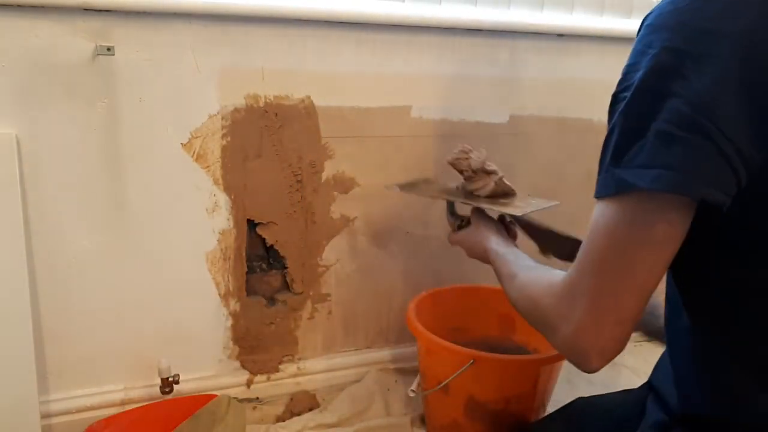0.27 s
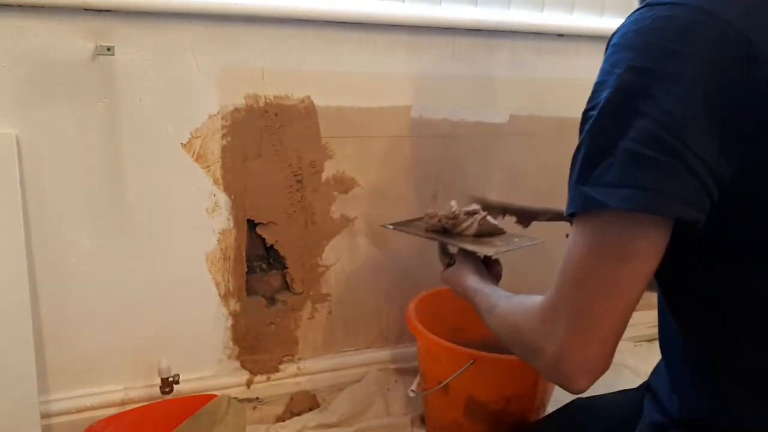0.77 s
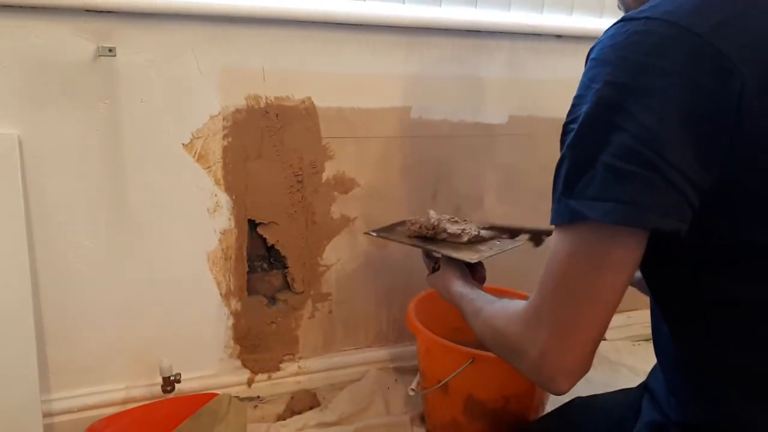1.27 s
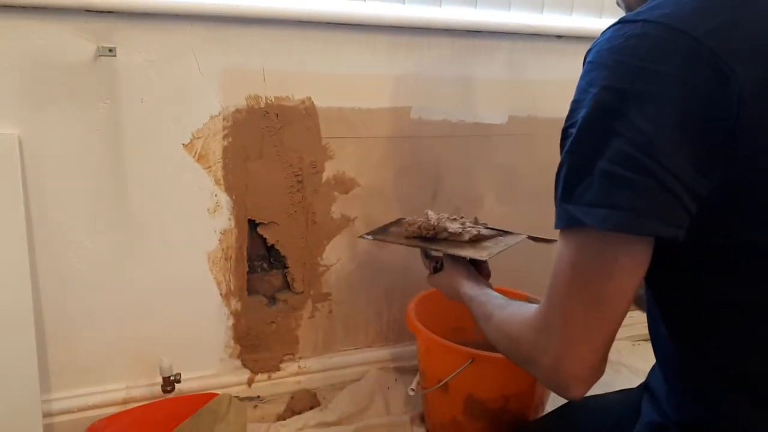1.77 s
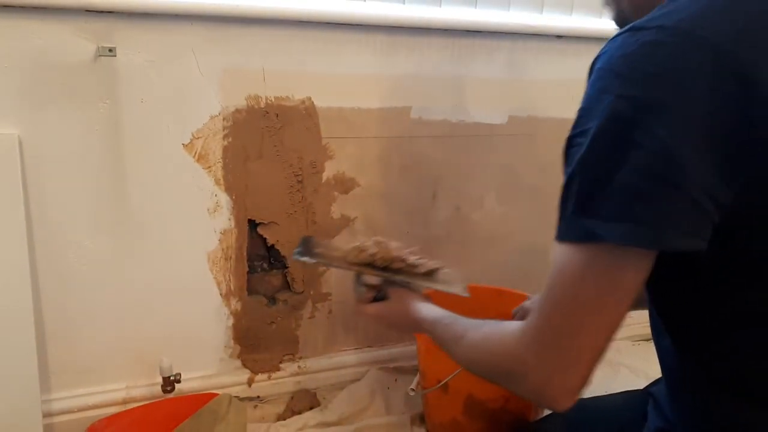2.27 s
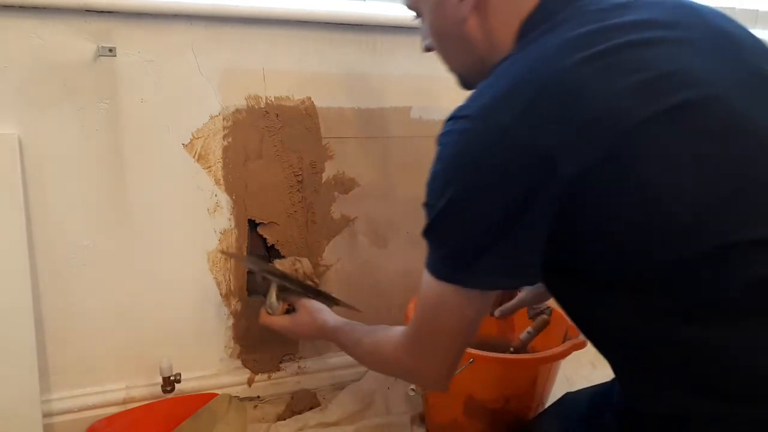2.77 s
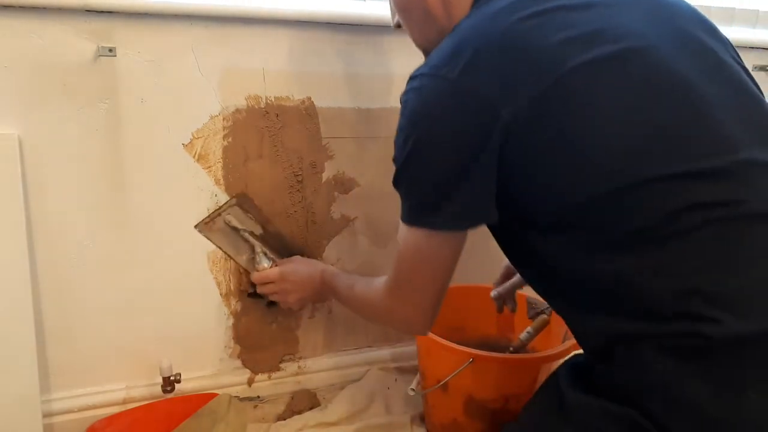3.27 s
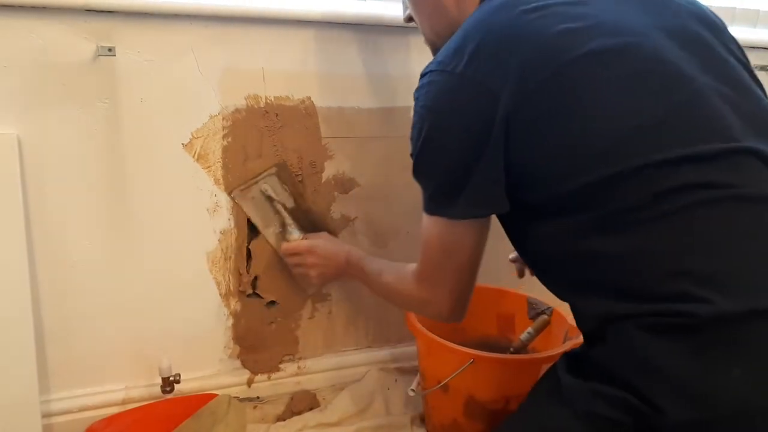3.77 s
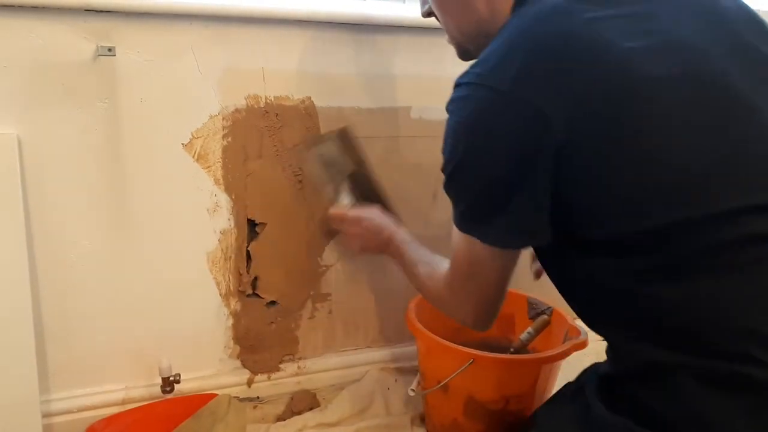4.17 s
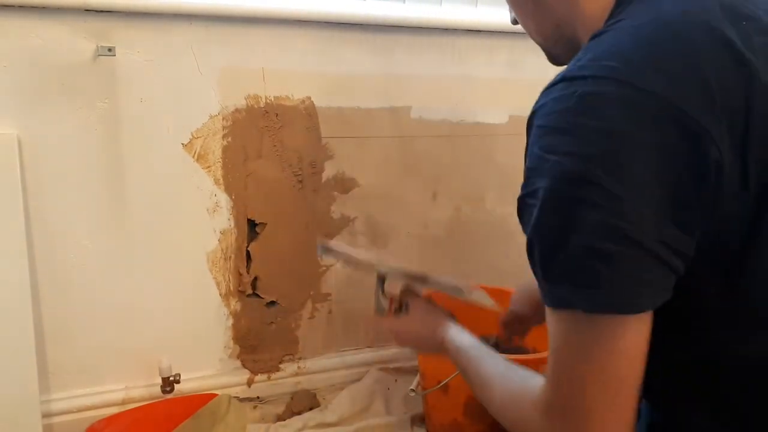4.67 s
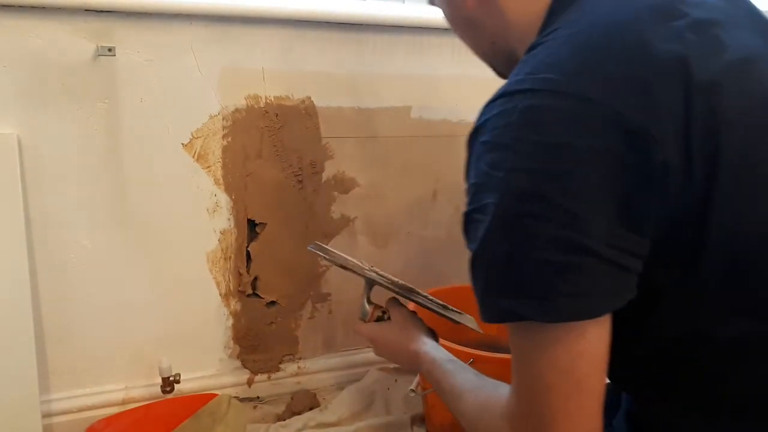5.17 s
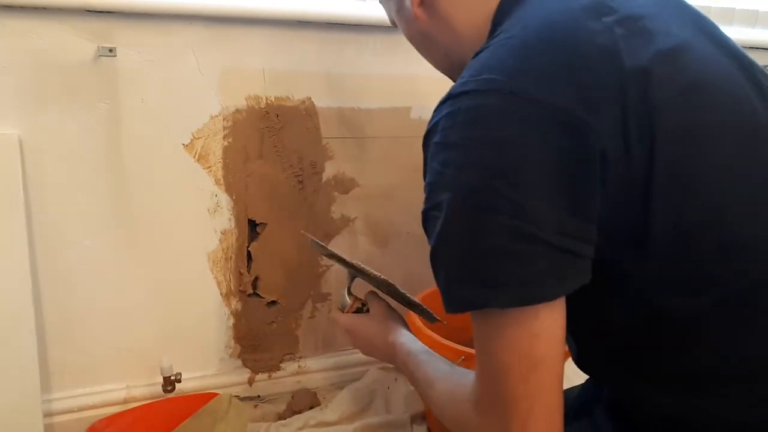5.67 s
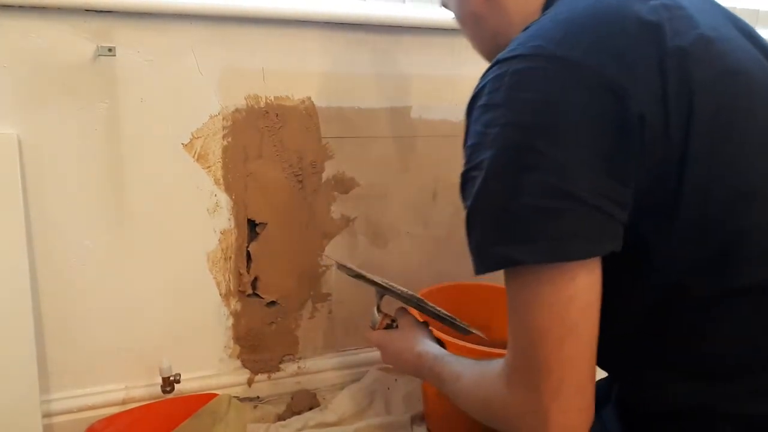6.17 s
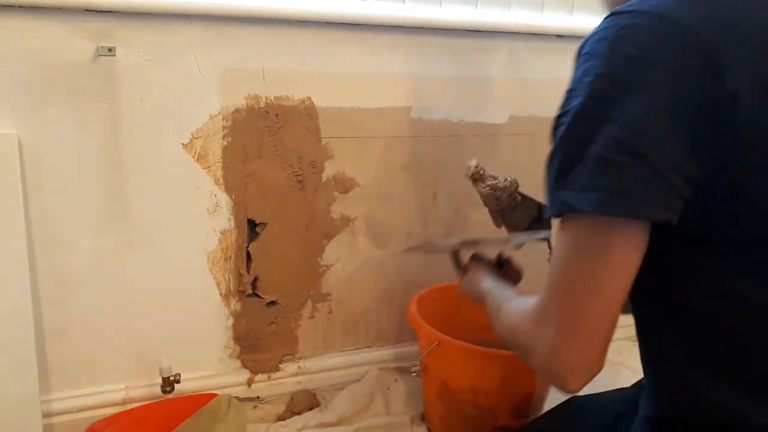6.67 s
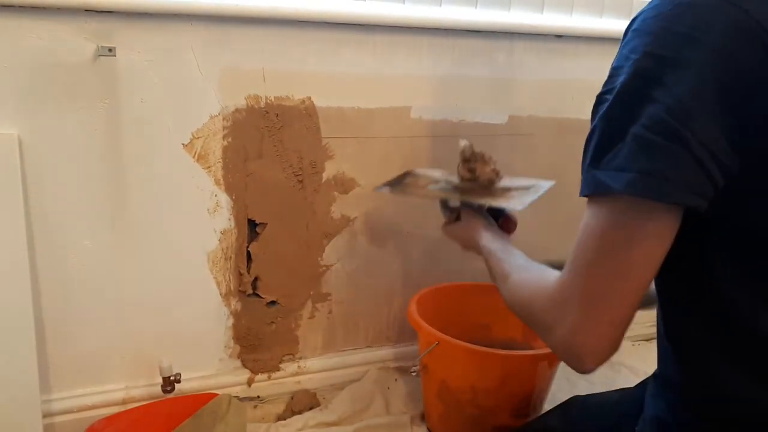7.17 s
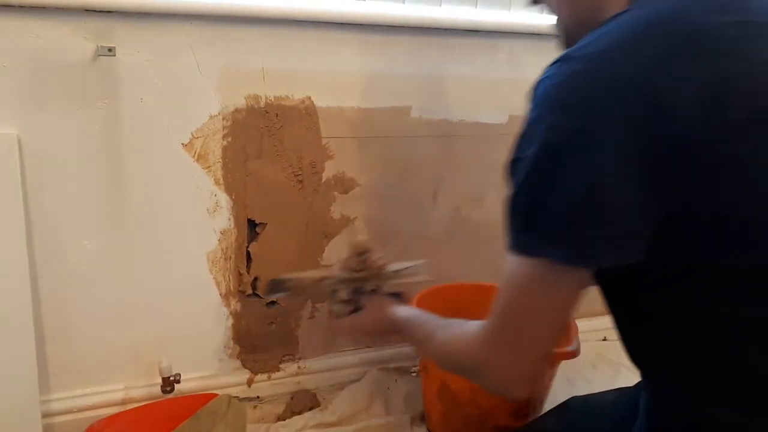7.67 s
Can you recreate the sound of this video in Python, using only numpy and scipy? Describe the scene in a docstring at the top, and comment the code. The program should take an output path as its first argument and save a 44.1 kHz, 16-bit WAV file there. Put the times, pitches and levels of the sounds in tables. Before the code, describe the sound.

A close stereo pickup in a bare room with a short echo, the right side muffled, over faint steady rumble, hum and hiss. At 0-0.3 s a trowel makes three quick gritty scrapes on a steel float, with thin metallic taps; slight rustles follow around 0.6 s. Near-quiet until a faint tick at 1.4 s and two short sandy scrapes at 1.6-1.8 s. At 2.5 s a brief rough plastic bucket scrape and knock. Light steel taps at 2.9-3.2 s, then soft wall strokes from 3.4 s, a firmer drag with clinks at 3.8 s, and a bright ringing double clank at 4.1 s. Hollow bucket knocks at 5.0-5.4 s lead to a coarse dig and floor thump at 5.5 s, then weaker bumps until 6.2 s. At 6.75-7.0 s two steel scrapes, the second loud and sharp. Bucket scuffing and a knock with a soft thump end it at 7.3-7.6 s.

```python
"""A plasterer's steel float is scraped with a small trowel and dragged over the wall, in a bare room; between
times the plasterer digs in a plastic bucket. Sand grains slip under the steel: random clicks, shaped by each push
of the hand, ring the modes of the blade or bucket. Taps and knocks ring them too and crush grit into short hisses.
Floor thumps and soft treble rustles join in; all these echo in the room, over a steady bed of rumble, hum and hiss.
Two microphone ports pick it up, one of them half covered, and a gain control turns loud moments down."""
import sys
import numpy as np
from scipy import signal
from scipy.fft import rfft, irfft, next_fast_len
from scipy.io import wavfile
from scipy.ndimage import uniform_filter1d

SR = 44100
rng = np.random.default_rng(int(sys.argv[2]) if len(sys.argv) > 2 else 0)


def wav_record(signal):
    """Record a signal, one row per channel, as 16-bit PCM in the file named by sys.argv[1]."""
    frames = np.transpose(np.atleast_2d(signal))
    bounded = np.clip(frames, -1, 1)
    # unit amplitude maps onto the largest positive 16-bit level
    quanta = np.round(bounded * 32767).astype(np.int16)
    wavfile.write(sys.argv[1], SR, quanta)


N = 348831   # length in samples

# Background air noise. Each row: frequency in Hz, relative strength in dB per Hz.
AIR_SPECTRUM = [(15, -53), (25, -26), (43, -31.5), (96, -1.5), (156, -19), (173, -14), (246, -6.5),
                (281, -15), (399, -23.5), (433, -10), (523, -26), (666, -23.5), (1570, -31), (15500, -42)]
AIR_DB = -62   # overall level
# How alike left and right are. Each row: frequency in Hz, likeness from -1 to 1.
LEFT_RIGHT_LIKENESS = [(60, 0.55), (240, 0.85), (950, -0.092), (3770, -0.84), (15000, 0.15)]
# How long the room rings. Each row: frequency in Hz, seconds to die away by 60 dB.
ROOM_DECAY = [(80, 1), (300, 0.4), (1000, 0.43), (3000, 0.42), (7000, 0.39), (12000, 0.17), (16000, 0.52)]
# Tone of the open left port. Each row: frequency in Hz, gain in dB.
OPEN_PORT_TONE = [(5500, -0.72), (6800, 1), (7600, 5), (8300, -1.5), (9000, -5), (11000, 0.5)]
# Tone of the half-covered right port. Each row: frequency in Hz, gain in dB.
COVERED_PORT_TONE = [(60, -1.5), (200, 0), (700, -4.5), (2400, -9), (4400, -15), (8000, -42.5),
                     (12000, -15), (16000, -25.5)]
# Weight on the floorboards. Each row: start in seconds, strength of the push in dB.
FLOOR_PUSHES = [(2.466, -61.5), (5.48, -52), (7.358, -73), (7.501, -59)]
# Resonances of the floor. Each row: frequency in Hz, width in Hz, strength in dB.
FLOOR_RESONANCES = [(80.4, 65, -19), (99.8, 29, 18), (149, 52, 25.5)]
# Faint treble rustles. Each row: start in seconds, strength in dB, length in seconds.
RUSTLE_PUFFS = [(0.577, -61, 0.085), (0.702, -61.5, 0.077), (4.659, -67.5, 0.11), (4.907, -53.5, 0.094),
                (5.424, -53.5, 0.087), (7.58, -65, 0.16)]
# Hiss of fine grit. Each row: frequency in Hz, relative strength in dB per Hz.
GRIT_SPECTRUM = [(290, -35), (500, -12.5), (1090, -16), (1250, -12), (1470, -5.5), (2260, -9), (2610, -14),
                 (3240, -11.5), (7560, -15.5), (9110, -16), (15500, -20.5)]
# Pushes in the bucket. Each row: start in seconds, rise in seconds, fall in seconds, grinding at the start in dB,
# grinding at the top in dB, low modes in dB above the grinding, fine grit in dB above the grinding.
BUCKET_PUSHES = [(2.462, 0.0058, 0.042, -24, -38.5, -2, -29), (2.51, 0.072, 0.032, -42, -34, -4.5, -20.5),
                 (4.955, 0.092, 0.22, -50, -48, 2.5, -6.5), (5.137, 0.014, 0.16, -55, -53.5, 8, -3.5),
                 (5.37, 0.041, .07, -63, -66, 30, -5.5), (5.474, 0.0097, 0.27, -36, -23, -1.5, -17.5),
                 (5.67, 0.074, .14, -61, -45.5, 9, -10.5), (5.95, 0.11, 0.062, -61.5, -57, 3.5, -3.5),
                 (6.09, 0.039, 0.14, -64, -50.5, 0.5, -2.5), (7.3, 0.092, 0.056, -50, -53, -11, -21),
                 (7.5, 0.038, 0.13, -32.5, -51.5, -4.5, -35)]
# Knocks on the bucket. Each row: time in seconds, strength in dB, crack in dB above it, hardness in dB per octave,
# frequency in Hz favoured by grip and flex from then on, upper frequency in Hz favoured by the struck spot.
BUCKET_HITS = [(2.465, -21, -31, 3, 314, 1564), (4.957, -17.5, -22.5, -9, 330, 444),
               (5.136, -11, -36, -4, 385, 820), (5.169, -24.5, -12.5, 2, 366, 830),
               (5.37, -12, -43, -12, 369, 444), (5.475, -19.5, -3, 4, 244, 1750),
               (5.728, -25.5, -16, 4, 284, 810), (6.107, -27, -20.5, -5, 422, 820),
               (7.346, -33, -26, 6, 411, 820), (7.501, -21, -30, 1.5, 319, 2700)]
# Resonances of the bucket. Each row: frequency in Hz, width in Hz before hand damping, strength in dB.
BUCKET_MODES = [(192, 87, -4), (270.7, 29, -1.5), (317.2, 12.3, -1.5), (349.7, 14.4, 1), (444, 40, 4),
                (614, 66, -3), (820, 72, 1), (1010, 270, -2), (1212, 140, -1), (1564, 400, 0),
                (1750, 430, -2.5), (2000, 72, -7.5), (2700, 660, -9.5), (3240, 720, -4.5),
                (4060, 690, -20.5)]
# Pushes of steel on steel or wall. Same columns as the bucket pushes.
STEEL_PUSHES = [(0.0, 0.0076, 0.077, -46.5, -43, -6.5, -3.5), (0.07, 0.037, .055, -44, -34.5, -10.5, -4),
                (0.165, 0.049, 0.049, -42.5, -34.5, -5.5, 6), (1.578, .085, .03, -66.5, -44.5, -7, 4.5),
                (1.685, 0.09, 0.046, -38.5, -31.5, -6, 3.5), (3.43, 0.087, 0.17, -68.5, -42.5, -13, -12),
                (3.64, 0.07, 0.075, -51, -45, -20, -7), (3.80, 0.057, 0.46, -47.5, -34.5, -13.5, -4.5),
                (4.052, 0.052, 0.054, -33, -34, -12.5, -16.5),
                (6.742, 0.095, 0.065, -43, -33.5, -5.5, -5.5), (6.89, 0.061, .07, -39, -18.5, -11.5, -7)]
# Touches of the steel. Same columns as the bucket knocks.
STEEL_HITS = [(0.004, -37.5, -2, 5, 1350, 610), (0.076, -27, -12.5, 3, 1380, 632),
              (0.203, -29, -6.5, -3, 1480, 1680), (1.357, -50, -3, -2.5, 1183, 3850),
              (1.581, -50.5, 5.5, -5.5, 1290, 438), (2.925, -43.5, -12, 7, 2550, 5000),
              (3.151, -35.5, -24.5, -8, 1400, 880), (3.178, -43, -25, -12, 1420, 610),
              (3.432, -46, -18.5, 0, 1440, 1680), (3.47, -48.5, 1, -1.5, 1390, 875),
              (3.699, -28.5, -27.5, -2, 1400, 875), (3.715, -34, 0.5, 12, 1360, 875),
              (3.826, -21.5, -14.5, 3, 1440, 1680), (3.86, -16, -17, 3.5, 1420, 1680),
              (4.059, -11, -23, 1.5, 1175, 642), (4.124, -17.5, -20, -3.5, 1185, 626),
              (6.745, -35, -11, 4.5, 1216, 1680), (6.935, -18.5, -6.5, 8.5, 1211, 2300)]
# Resonances of the blade. Same columns as the bucket resonances.
BLADE_MODES = [(460, 79, -8.5), (617, 160, -14.5), (830, 55, -15), (878, 19, -4), (1165, 31, 4.5),
               (1247, 10, 8.5), (1331, 57, 14), (1320, 11, -7.5), (1394, 15, 0), (1680, 26, 1),
               (1960, 180, -11), (2150, 75, -20), (2550, 51, -1.5), (2750, 54, -22), (3200, 63, -17.5),
               (3850, 180, -20.5), (5000, 77, -18)]
# Easing off past the top of a push, in dB per second: grinding, low modes, fine grit.
EASE_RATES = (125.5, 111, 89)
# Band of the coarse grains: lower edge in Hz, upper edge in Hz.
COARSE_BAND = (1860, 4300)

LOW_MODES_HZ = 700   # modes below this count as low
LAND_S, LIFT_S = 0.00065, 0.02   # seconds for a push to land and to lift away
SPOT_OCTAVES = 0.07   # reach of a struck spot
CUTOFF_HZ = 15800   # the top is cut above this


def amp(db):
    """Turn a level in dB into a gain."""
    return 10 ** (np.asarray(db) / 20)


def rms_one(x):
    """Scale a signal to an rms of 1."""
    return x / np.sqrt(np.mean(x ** 2) + 1e-20)


def at_hz(points, hz):
    """Read a table between its rows, on a log-frequency axis."""
    table_hz, values = np.array(points)[:, 0], np.array(points)[:, 1]
    return np.interp(np.log(hz + 1), np.log(table_hz), values)


def band_pass(x, edges):
    """Keep what lies between two frequencies in Hz."""
    return signal.sosfilt(signal.butter(2, edges, "band", fs=SR, output="sos"), x)


def colour(x, spectrum):
    """Give a sound the dB response of a table, with no sound ahead of its cause (minimum phase)."""
    cepstrum = irfft(np.log(amp(at_hz(spectrum, np.arange(2049) * SR / 4096))))
    # folding the second half onto the first makes the filter minimum-phase
    cepstrum[1:2048] *= 2
    cepstrum[2049:] = 0
    response = irfft(np.exp(rfft(cepstrum)))
    response = response.reshape((1,) * (x.ndim - 1) + (-1,))
    return signal.oaconvolve(x, response, axes=-1)[..., :N]


def drift(rate_hz):
    """Slow random wander with a spread of 1: smoothed noise, drawn at every 40th sample."""
    r = np.exp(-2 * np.pi * rate_hz * 40 / SR)
    noise = rng.standard_normal(N // 40 + 2002)
    slow = signal.lfilter([1], [1, -2 * r, r * r], noise)[2000:]   # skip the settling
    return np.interp(np.arange(N) / 40, np.arange(len(slow)), rms_one(slow))


def ring(x, hz, width):
    """One resonance: a click rings and dies; soft contact dulls what lies far above its pitch."""
    r, w = np.exp(-np.pi * width / SR), 2 * np.pi * hz / SR
    soft = signal.lfilter(*signal.butter(2, 2 * hz, fs=SR), x + 1e-18)
    return signal.lfilter([0.5, 0, -0.5], [1, -2 * r * np.cos(w), r * r], soft)


def bands(shape):
    """Half-octave bands of white noise, each with its centre in Hz."""
    edges = 22 * 2 ** np.arange(0, 9.8, 0.5)
    white = rng.standard_normal((2,) + shape)   # neighbouring bands use different noise
    for k, (low, high) in enumerate(zip(edges, edges[1:])):
        yield np.sqrt(low * high), band_pass(white[k % 2], [low, high])


def stereo(pair, alike):
    """Mix two unrelated signals into two channels of a given likeness."""
    alike = np.clip(alike, -1, 1)
    shared, opposed = np.sqrt(1 + alike) * pair[0], np.sqrt(1 - alike) * pair[1]
    return np.array([shared + opposed, shared - opposed])


def air():
    """Distant rumble and hum of the house, passing into port hiss: noise bands whose levels wander."""
    together_db = drift(2)   # all bands swell as one
    noise = 0
    for hz, pair in bands((2, N)):
        level_db = at_hz(AIR_SPECTRUM, hz) + together_db + 0.95 * drift(6)
        noise = noise + amp(level_db) * stereo(pair, at_hz(LEFT_RIGHT_LIKENESS, hz))
    return amp(AIR_DB) * rms_one(noise) * amp([[1.2], [-1.2]])   # left a little louder


def room(x, direct_db, wet_db, tail_rise_s, move_s, count):
    """Direct sound and a dense tail dying band by band; the tools move, so the echoes keep changing."""
    t = np.arange(SR // 2 + SR // 8) / SR
    tail = 0
    for hz, pair in bands((2, count, len(t))):
        decay = amp(-60 * t / at_hz(ROOM_DECAY, hz))
        tail = tail + stereo(pair, at_hz(LEFT_RIGHT_LIKENESS, hz)) * decay
    tail *= np.clip(t / tail_rise_s, 0, 1)
    response = amp(wet_db) * tail / np.sqrt(np.mean(np.sum(tail ** 2, axis=-1)))
    places = np.arange(count)
    # the right port hears first, by a lag that depends on the place
    response[0, places, 2 + 2 * places] += amp(direct_db)
    response[1, :, 0] += amp(direct_db)
    turn = (np.arange(N) / SR / move_s - places[:, None]) % count
    share = np.sin(np.pi / 2 * np.minimum(turn, 2))   # equal-power fades from place to place
    size = next_fast_len(N + len(t))
    echoes = rfft(x * share, size) * rfft(response, size)
    return irfft(np.sum(echoes, axis=1), size)[:, :N]


def thumps():
    """Weight on the floorboards: each soft push rings the floor's resonances."""
    push = np.zeros(N)
    for start, db in FLOOR_PUSHES:
        push[int(start * SR)] = amp(db)
    return sum(amp(db) * ring(push, hz, width) for hz, width, db in FLOOR_RESONANCES)


def rustles():
    """Short soft puffs of treble noise: each rises quickly and fades in a straight line."""
    t = np.arange(N) / SR
    shape = np.zeros(N)
    for start, db, length in RUSTLE_PUFFS:
        rise = np.clip((t - start) / 0.012, 0, 1)
        fade = np.clip(1 - (t - start) / length, 0, 1)
        shape += amp(db) * rise * fade
    return shape * band_pass(rng.standard_normal(N), [4500, 9000])


def pressure(pushes):
    """Gains of grinding, low modes and fine grit: each push climbs to its top, eases off and lifts away."""
    gains = np.zeros((3, N))
    for start, rise, fall, start_db, top_db, low_db, grit_db in pushes:
        first = int(start * SR)
        t = np.arange(int((rise + fall) * SR)) / SR
        touch = np.clip(np.minimum(t / LAND_S, (rise + fall - t) / LIFT_S), 0, 1)
        climb_db = np.interp(t, [0, rise], [start_db, top_db])
        ease_db = np.outer(EASE_RATES, np.maximum(t - rise, 0))
        level_db = climb_db - ease_db + [[0], [low_db], [grit_db]]
        gains[:, first:first + len(t)] += touch * amp(level_db)
    return gains


def grains(per_s, spread_db, clump_db):
    """Slips of single sand grains: random clicks of uneven size that come in clumps."""
    sizes = amp(spread_db * np.minimum(rng.exponential(1, N), 5)) * rng.choice([-1, 1], N)
    slips = rng.random(N) < per_s / SR
    return rms_one(sizes * slips * amp(clump_db * drift(31)))


def noise_burst(clicks, decay_s):
    """Each click becomes a burst of noise that dies away exponentially."""
    return signal.lfilter([1], [1, -np.exp(-1 / (decay_s * SR))], clicks) * rng.standard_normal(N)


def landing(at, jolt_s):
    """An edge lands with one firm first touch and a short rattle."""
    contact = np.zeros(N)
    contact[at] = np.sqrt(2 / (jolt_s * SR))
    return 0.6 * noise_burst(contact, jolt_s) + 0.54 * (contact > 0)


def scraped(pushes, hits, modes, per_s, spread_db, clump_db, ring_db, low_db, grit_db, coarse_db,
            hit_db, tick_db, pivot_hz, favour_db, octaves, jolt_s):
    """Grains and blows excite one body's modes; both also crack directly into the air."""
    grind, low, fine = pressure(pushes)
    sand = grains(per_s, spread_db, clump_db)
    hit_s, strength_db, crack_db, hardness, favoured_hz, upper_hz = np.transpose(hits)
    at = (hit_s * SR).astype(int)
    # the latest hit at each moment; the first one also serves before it
    last_hit = np.maximum(np.searchsorted(at, np.arange(N), side="right") - 1, 0)
    mode_hz, _, mode_db = np.transpose(modes)
    is_low = mode_hz < LOW_MODES_HZ
    group_power = [np.sum(amp(mode_db[is_low == group]) ** 2) for group in (False, True)]
    rubbing = [amp(ring_db) * grind * sand, amp(low_db) * low * sand]
    jolt = landing(at, jolt_s)
    body = np.zeros(N)
    for k, (hz, width, db) in enumerate(modes):
        width = max(width, hz / 35)   # hand and wet plaster damp every mode
        group = int(is_low[k])
        spot_db = 6.9 * np.exp(-(np.log2(hz / upper_hz) / SPOT_OCTAVES) ** 2)
        tilt_db = hardness * np.log2(hz / pivot_hz)   # hard blows favour high modes
        mode_share = amp(db) * np.sqrt(4 * np.pi * width / SR / group_power[group])
        # rubbing goes on near the struck spot and keeps part of its hardness
        rub_gain = amp(0.53 * spot_db + 0.21 * tilt_db)[last_hit]
        hit_gain = amp(strength_db + hit_db + db + spot_db + tilt_db)[last_hit]
        force = rubbing[group] * mode_share * rub_gain + jolt * hit_gain
        grip = amp(favour_db * np.exp(-(np.log2(hz / favoured_hz) / octaves) ** 2))
        body += (-1) ** k * ring(force * grip[last_hit], hz, width)
    ticks = np.zeros(N)
    ticks[at] = amp(strength_db + crack_db + tick_db)
    crumbs = noise_burst(ticks, 0.0037)   # a blow crushes grit for a few ms
    coarse = band_pass(amp(coarse_db) * grind * sand, COARSE_BAND)   # big grains follow the grinding
    treble_gain = amp(at_hz(GRIT_SPECTRUM, np.linspace(3500, SR / 2, 500)))
    grit = colour(amp(grit_db) * fine * sand + crumbs, GRIT_SPECTRUM) / np.sqrt(np.mean(treble_gain ** 2))
    return body + coarse + grit


def plastic_bucket():
    """Digging in the bucket: grains and knocks ring its broad plastic modes."""
    return scraped(BUCKET_PUSHES, BUCKET_HITS, BUCKET_MODES, per_s=5800, spread_db=4, clump_db=3,
                   ring_db=-3.8, low_db=-6.5, grit_db=-1.5, coarse_db=-12, hit_db=-19.5, tick_db=-4,
                   pivot_hz=427, favour_db=4.5, octaves=0.12, jolt_s=0.0013)


def steel_float():
    """Trowel on float and float on wall: grains and taps ring a thin blade, which radiates no bass."""
    steel = scraped(STEEL_PUSHES, STEEL_HITS, BLADE_MODES, per_s=12000, spread_db=2.5, clump_db=5,
                    ring_db=-2, low_db=4.7, grit_db=4.5, coarse_db=2.5, hit_db=-14.5, tick_db=6.5,
                    pivot_hz=1270, favour_db=9.5, octaves=0.056, jolt_s=0.00097)
    return signal.sosfilt(signal.butter(2, 260, "high", fs=SR, output="sos"), steel)


def scene():
    """Float, bucket, thumps and rustles in the room, through an open and a covered port, plus air noise."""
    sources = steel_float() + plastic_bucket() + thumps() + rustles()
    left, right = room(sources, direct_db=-2, wet_db=0.42, tail_rise_s=0.0039, move_s=0.05, count=4)
    return np.array([colour(left, OPEN_PORT_TONE), colour(right, COVERED_PORT_TONE)]) + air()


def record(dry):
    """Gain control ducks loud moments and lets go slowly; the top is cut."""
    power = uniform_filter1d(np.mean(dry ** 2, axis=0), size=441)   # 10 ms average
    level_db = 10 * np.log10(power + 1e-12)
    release_db = 38 * np.arange(N) / SR   # the held level falls 38 dB per second
    held_db = np.maximum.accumulate(level_db + release_db) - release_db
    duck_db = -0.12 * np.maximum(held_db + 34.5, 0)   # acts above -34.5 dB
    gain = uniform_filter1d(amp(duck_db), size=441)
    top_cut = signal.ellip(12, 0.5, 80, CUTOFF_HZ, fs=SR, output="sos")
    return signal.sosfilt(top_cut, dry * gain)


dry = scene()
out = record(dry)
wav_record(out)
```